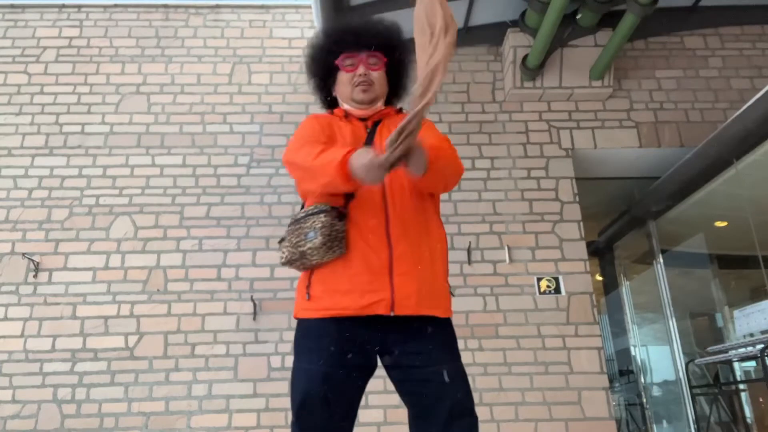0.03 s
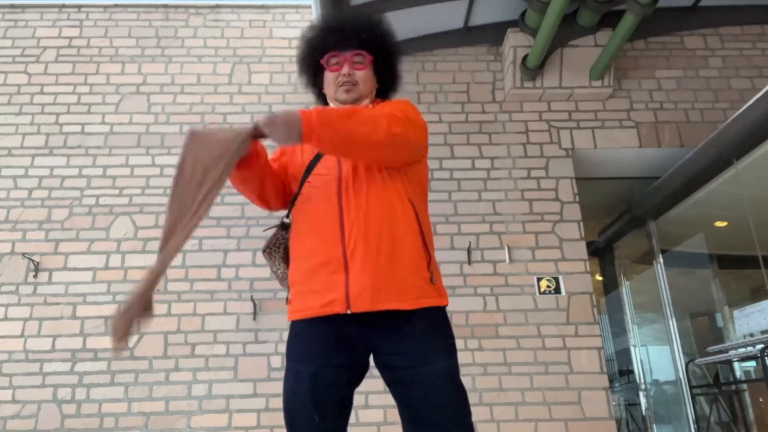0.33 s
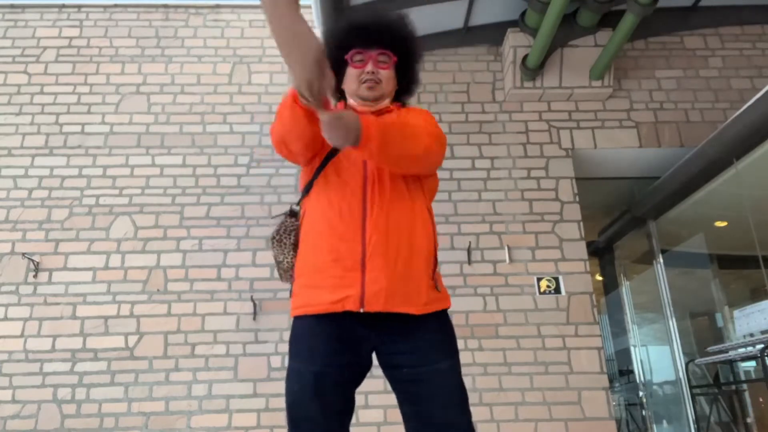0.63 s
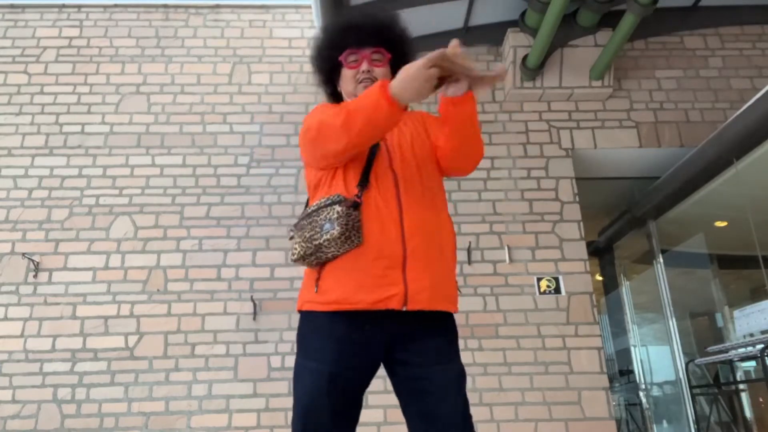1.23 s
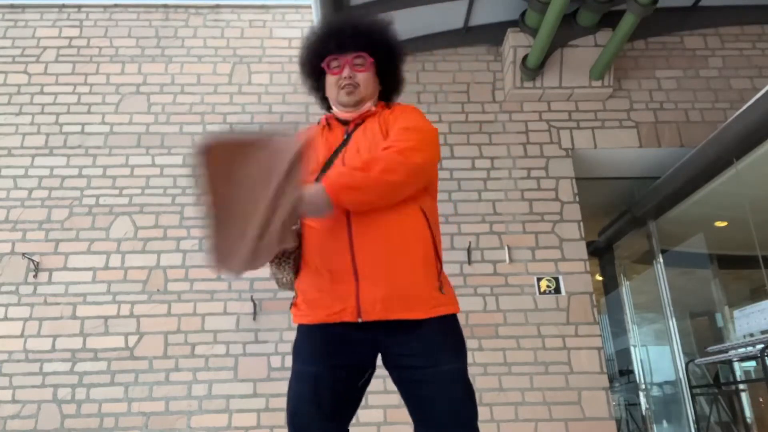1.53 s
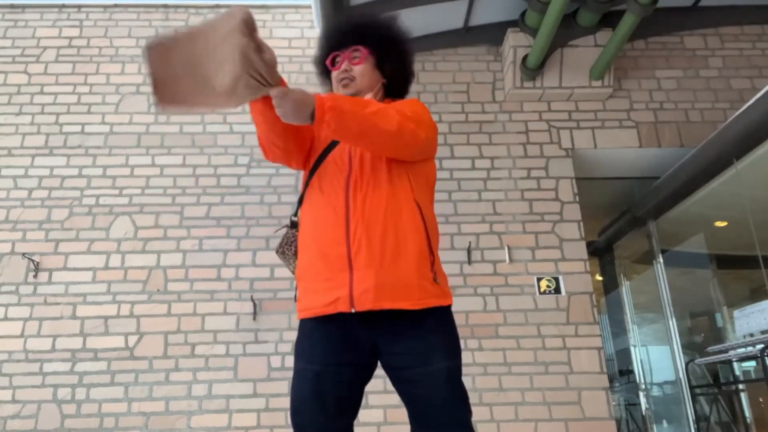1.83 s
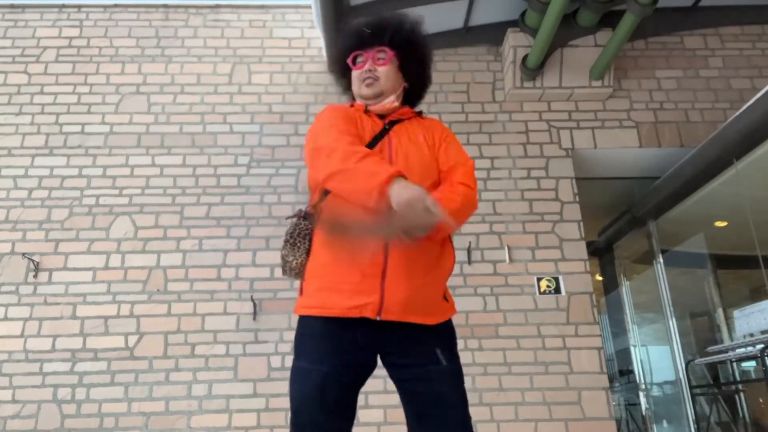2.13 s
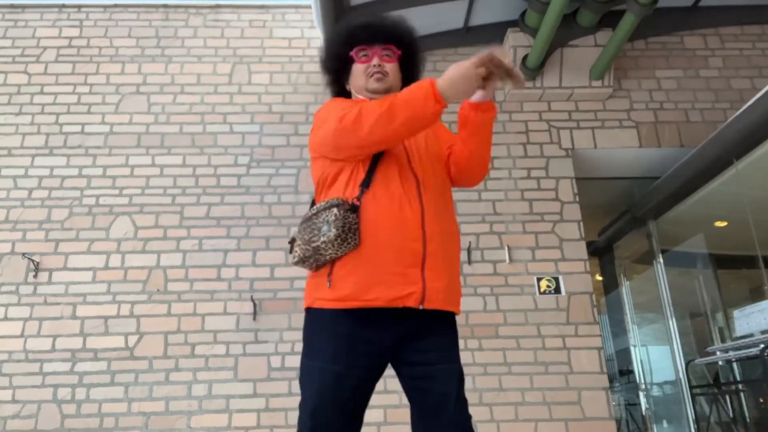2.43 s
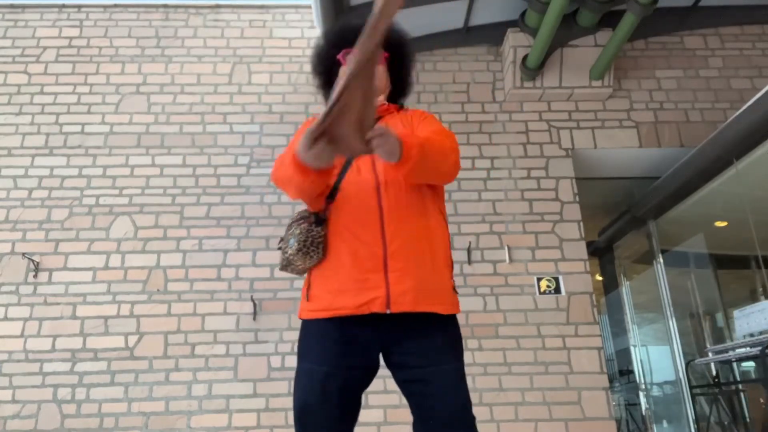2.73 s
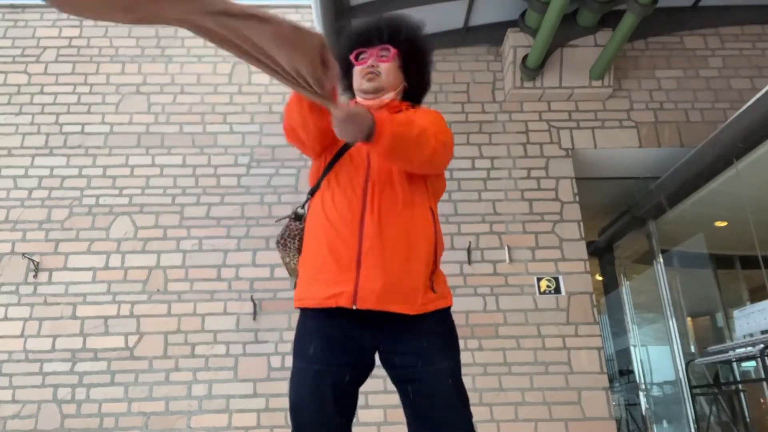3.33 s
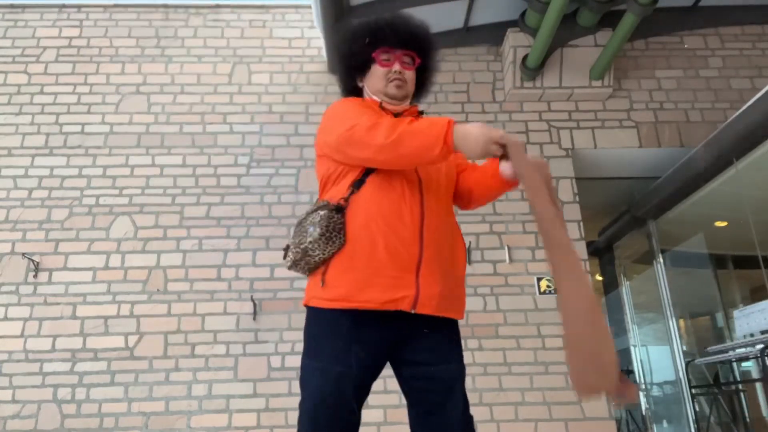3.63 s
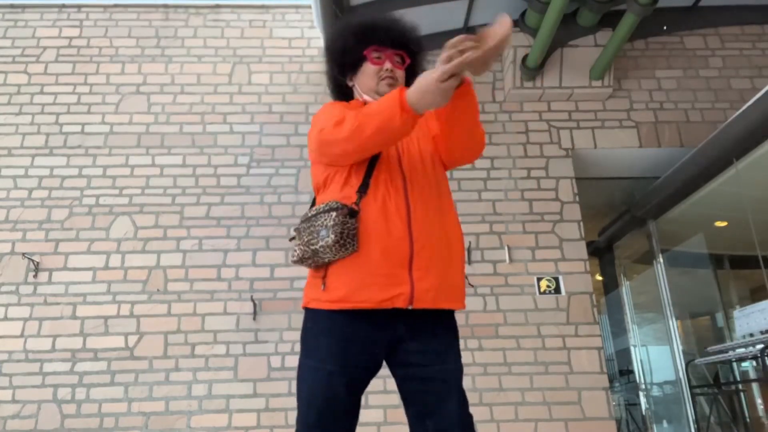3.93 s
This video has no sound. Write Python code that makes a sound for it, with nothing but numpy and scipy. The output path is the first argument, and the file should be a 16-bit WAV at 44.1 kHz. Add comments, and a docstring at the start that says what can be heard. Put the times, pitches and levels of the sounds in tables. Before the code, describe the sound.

Rhythmic swishing of a nylon jacket and a swung towel, with low street rumble behind.

```python
"""Nylon sleeves swish against a jacket as someone swings a towel from side to side by a stone wall.
Each arm stroke is a friction hiss with a fizz of tiny crease snaps on top. The towel whooshes and
whistles on the fast passes, and its draught buffets the microphone with low thumps.
A zip pull ticks now and then; an engine idles some way off, over a bed of street wash."""
import sys
import numpy as np
from scipy import signal
from scipy.fft import rfft, irfft
from scipy.io import wavfile

SR = 44100
rng = np.random.default_rng(int(sys.argv[2]) if len(sys.argv) > 2 else 0)


def generate_wav(signal):
    """Clip the signal to [-1, 1] and save it as 16-bit WAV at the path in sys.argv[1]."""
    frames = np.transpose(np.atleast_2d(signal))
    scaled = np.clip(frames, -1, 1) * 32767
    pcm = np.round(scaled).astype(np.int16)
    wavfile.write(sys.argv[1], SR, pcm)


N = 176400
T = np.arange(N) / SR
HZ = np.fft.rfftfreq(N, 1 / SR)

# Wash of distant traffic (frequency [Hz], relative level [dB])
STREET_EQ = [(15, -39), (30, -20), (48, 1), (75, -0.5), (108, -1.5), (150, -6.5), (220, -9), (320, -10.5),
             (400, -20), (550, -21), (800, -18.5), (1170, -19), (1400, -25), (1800, -26), (2400, -32),
             (3200, -30), (4200, -35.5), (7000, -36), (15000, -61)]
# Exhaust boom (multiple of the firing rate [x], level [dB])
BOOM_PARTIALS = [(1, -52.5), (2, -42), (2.5, -56), (3, -39.5), (4, -57)]
# Body of the engine note (frequency [Hz], level of a partial there [dB])
DRONE_CURVE = [(125, -82.5), (170, -63.5), (215, -58.5), (255, -55), (310, -66.5), (380, -67), (600, -72.5),
               (900, -76), (1150, -76.5), (1400, -89.5)]
# Whine of belts and fans (frequency [Hz], level [dB])
WHINE_TONES = [(247, -57.5), (261.5, -52), (438.6, -61), (595, -65.5), (721.5, -68), (791.5, -59.5),
               (820, -72), (962, -65), (1070, -61), (1131, -61.5), (1153, -63), (1173, -60.5), (1205, -79),
               (1307, -69), (1743, -75), (2083, -71)]
# Mechanical clatter (frequency [Hz], relative level [dB])
CLATTER_EQ = [(100, -31), (190, -7.5), (255, 2), (330, 3), (420, -24), (700, -10.5), (1150, -12),
              (1400, -14.5), (3000, -26.5), (8000, -31)]
# Ticks of the zip pull (time [s], level [dB])
ZIP_TICKS = [(1.156, -45), (1.1732, -41.5), (2.4823, -43.5), (2.5361, -53), (3.8122, -43.5), (3.8816, -46)]
# Eddies hitting the microphone
# (centre time [s], core half length [s], core peak [dB], rumble half length [s], rumble level [dB])
EDDY_HITS = [(0.7225, .0019, -19, .013, -25), (.768, 0.0055, -33, 0.019, -24.5),
             (0.8403, 0.0024, -20, .018, -30), (2.55, .0014, -27, .011, -34.5)]
# Turbulent rumble around an eddy (frequency [Hz], relative level [dB])
RUMBLE_EQ = [(15, -20), (35, -2), (55, 1), (125, -1.5), (190, -11.5), (300, -17.5), (420, -31),
             (900, -54.5)]
# Fast passes of the towel
# (centre time [s], half length [s], whoosh level [dB], whistle pitch [Hz], whistle level [dB])
TOWEL_PASSES = [(.13, 0.06, -55, 3280, -68), (0.393, 0.03, -51.5, 3300, -62), (.78, 0.068, -55, 3130, -59),
                (1.45, 0.083, -55.5, 2960, -54.5), (2.07, 0.067, -52.5, 3190, -59),
                (2.846, 0.068, -67, 3010, -61), (3.48, .06, -74, 2950, -73)]
# Air rushing round the towel (frequency [Hz], relative level [dB])
WHOOSH_EQ = [(100, -8), (400, 11), (900, -3.5), (1400, -28.5), (2100, -5), (3500, -0.5), (6000, -15),
             (12000, -22)]
# Sleeve strokes (centre time [s], half length [s], rub level [dB], fizz trim [dB])
SLEEVE_STROKES = [(.09, 0.051, -49.5, 0), (0.158, 0.039, -49, 3.5), (0.272, 0.068, -51, 0.5),
                  (0.388, 0.04, -52.5, 2), (.60, 0.18, -59, -3), (0.777, 0.072, -54, 0),
                  (0.937, 0.11, -52, 0), (1.082, 0.066, -49.5, -3), (1.297, .07, -58, -4),
                  (1.428, .055, -50.5, 1.5), (1.543, 0.1, -52, 1.5), (1.667, 0.065, -56, 0),
                  (1.852, 0.11, -60.5, 1), (2.04, .06, -53.5, -1), (2.178, 0.072, -52, 1.5),
                  (2.30, 0.04, -49.5, 0), (2.41, 0.067, -51.5, -0.5), (2.613, .08, -61, -2),
                  (2.738, .05, -50.5, 2), (2.893, 0.087, -51, -0.5), (3.027, 0.065, -60, 0),
                  (3.505, 0.14, -54, 0.5), (3.73, 0.092, -52.5, 0)]
# Nylon sliding on nylon (frequency [Hz], relative level [dB])
RUB_EQ = [(700, -18), (1500, -0.5), (2100, 3), (3000, 0), (4500, -1), (6500, 0.5), (8000, 2), (9300, 5),
          (10000, 1.5), (10800, -15), (15000, -36)]
# Bright fizz of the creases (frequency [Hz], relative level [dB])
FIZZ_EQ = [(700, -47), (8000, -30), (10500, -7), (12000, -6), (13500, -1), (14500, -3), (16000, -8)]


def amp(db):
    """Decibels to gain."""
    return 10 ** (np.asarray(db) / 20)


def unit(x):
    """Scales to rms 1."""
    return x / np.sqrt(np.mean(x ** 2) + 1e-20)


def level_at(curve, hz):
    """Reads a curve in dB along a log-frequency axis."""
    curve_hz, db = np.transpose(curve)
    return np.interp(np.log(hz + 1), np.log(curve_hz + 1), db)


def colour(x, curve):
    """Runs a signal through an EQ curve, out at rms 1."""
    return unit(irfft(rfft(x) * amp(level_at(curve, HZ)), N))


def noise():
    """White noise."""
    return rng.standard_normal(N)


def band(centre_hz, octaves):
    """Noise in a bell-shaped band, rms 1."""
    bell = np.exp(-.5 * (np.log2((HZ + 1) / centre_hz) / octaves) ** 2)
    return unit(irfft(rfft(noise()) * bell, N))


def drift(rate_hz):
    """Smooth random modulation, rms 1."""
    lowpass = np.exp(-.5 * (HZ / rate_hz) ** 2) * (HZ > 0)
    return unit(irfft(rfft(noise()) * lowpass, N))


def swell(centre_s, half_s):
    """Bell envelope of a movement that speeds up and slows down again."""
    return np.exp(-.5 * ((T - centre_s) / half_s) ** 2)


def burst(x, envelope):
    """Shapes noise so that it carries exactly the energy of the envelope."""
    return unit(x * envelope) * np.sqrt(np.mean(envelope ** 2))


def street():
    """A bed of distant traffic, gently swelling."""
    level_db, swell_db = -39.5, .47
    return amp(level_db + swell_db * drift(3.5)) * colour(noise(), STREET_EQ)


def engine():
    """Idle firing drives exhaust boom, a drone and pulsing clatter; belts and fans add wavering whines."""
    firing_hz, speed_waver = 28.31, .003084
    phase = 2 * np.pi * np.cumsum(firing_hz * (1 + speed_waver * drift(2.83))) / SR
    surge_db, clatter_db = .9, -50
    boom = -sum(amp(db) * np.cos(order * phase) for order, db in BOOM_PARTIALS)
    boom *= amp(surge_db * drift(5))
    drone, whine = np.zeros(N), np.zeros(N)
    for order in np.arange(4.5, 48, .5):
        gain = amp(level_at(DRONE_CURVE, order * firing_hz))
        drone += gain * np.cos(order * phase + 2 * np.pi * rng.random())
    waver_db, waver_hz = 1.5, 2.14
    for hz, db in WHINE_TONES:
        gain = amp(db + waver_db * drift(2.7))
        pitch_hz = hz + waver_hz * drift(4.7)
        whine += gain * np.sin(2 * np.pi * np.cumsum(pitch_hz) / SR)
    # The clatter pulses with every firing, and lightly at half that rate.
    pulse = 1 + .48 * np.cos(phase) + .11 * np.sin(phase / 2)
    clatter = amp(clatter_db) * colour(noise() * pulse, CLATTER_EQ)
    return np.sqrt(2) * (boom + drone + whine) + clatter  # sqrt(2) makes the tone levels rms


def wall_reflections(x, level_db=-16, t60_s=.1, predelay_s=.008):
    """A short, sparse scatter of reflections off the wall and the canopy."""
    t = T[:SR // 2]
    taps = rng.standard_normal(len(t)) * (rng.random(len(t)) < .05) * (t > predelay_s)
    tail = taps * amp(-60 * t / t60_s)
    return amp(level_db) * signal.fftconvolve(x, tail / np.linalg.norm(tail))[:N]


def zip_pull(attack_s=.0006, t60_s=.023):
    """A small metal tab gives short, very high ticks."""
    ring, out = band(centre_hz=14800, octaves=.12), np.zeros(N)
    for start, db in ZIP_TICKS:
        age = np.maximum(T - start, 0)
        attack = np.minimum(age / attack_s, 1)
        decay = amp(-60 * np.minimum(age / t60_s, 2))
        out += amp(db) * burst(ring, attack * decay)
    return out


def draught():
    """Each eddy off the towel gives the microphone a push, then suction, wrapped in low turbulence."""
    rumble, out = colour(noise(), RUMBLE_EQ), np.zeros(N)
    for centre, core_half, core_db, rumble_half, rumble_db in EDDY_HITS:
        push_pull = (centre - T) / core_half * swell(centre, core_half) * np.sqrt(np.e)  # peaks at 1
        out += amp(core_db) * push_pull
        out += amp(rumble_db) * burst(rumble, swell(centre, rumble_half))
    return out


def towel(whistle_width_hz=260, rise_hz_per_s=2500):
    """A broad whoosh of air on each pass, with a breathy rising whistle at its fastest."""
    whoosh, out = colour(noise(), WHOOSH_EQ), np.zeros(N)
    for centre, half, whoosh_db, whistle_hz, whistle_db in TOWEL_PASSES:
        phase = 2 * np.pi * np.cumsum(whistle_hz + rise_hz_per_s * (T - centre)) / SR
        # Random level and phase smear the tone into a narrow band of noise.
        smear = drift(whistle_width_hz / 2) + 1j * drift(whistle_width_hz / 2)
        whistle = (smear * np.exp(1j * phase)).real
        out += amp(whoosh_db) * whoosh * swell(centre, half)
        out += amp(whistle_db) * burst(whistle, swell(centre, .4 * half))
    return out


def nylon_friction(snaps_per_s=3500, snap_share=.12, spread_db=5):
    """Sliding cloth: smooth hiss mixed with tiny snaps of creases."""
    snaps = noise() * (rng.random(N) < snaps_per_s / SR)
    snaps *= amp(spread_db * np.minimum(rng.exponential(1, N), 4))  # a few stick out
    return np.sqrt(1 - snap_share) * noise() + np.sqrt(snap_share) * unit(snaps)


def sleeves(fizz_offset_db=-4, flutter_db=.62):
    """Each arm stroke rubs nylon on nylon and sets the creases fizzing; the cloth never quite rests."""
    rub_power, fizz_power = amp(-61) ** 2, amp(-74) ** 2  # floor between strokes
    for centre, half, rub_db, fizz_trim_db in SLEEVE_STROKES:
        stroke_power = (amp(rub_db) * swell(centre, half)) ** 2
        rub_power += stroke_power
        fizz_power += stroke_power * amp(fizz_offset_db + fizz_trim_db) ** 2
    rub = np.sqrt(rub_power) * colour(nylon_friction(), RUB_EQ)
    fizz = np.sqrt(fizz_power) * colour(nylon_friction(), FIZZ_EQ)
    return (rub + fizz) * amp(flutter_db * drift(24))


def scene():
    """Mono mix: the swinging up front with its reflections, engine and street behind."""
    foreground = sleeves() + towel() + zip_pull()
    return (foreground + wall_reflections(foreground) + draught() + engine() + street())[None]


def record(dry):
    """A steep high cut takes off the very top of the mix."""
    cutoff_hz = 15720
    high_cut = signal.firwin(801, cutoff_hz, window=("kaiser", 9), fs=SR)
    return signal.oaconvolve(dry, high_cut[None], "same")


dry = scene()
out = record(dry)
generate_wav(out)
```